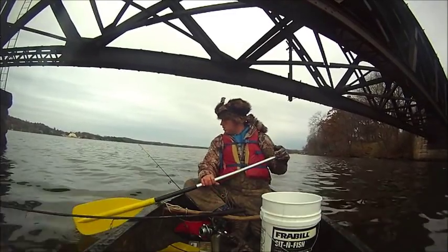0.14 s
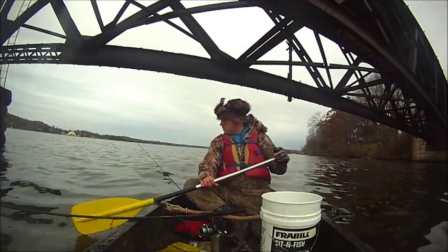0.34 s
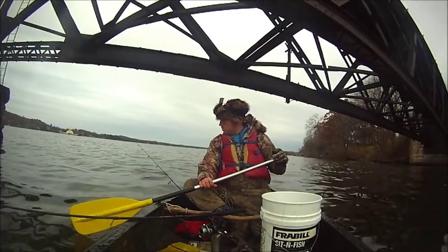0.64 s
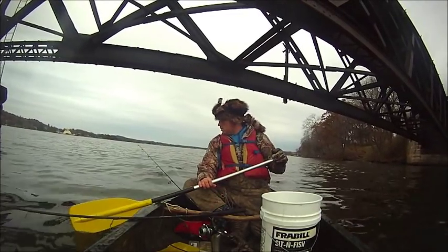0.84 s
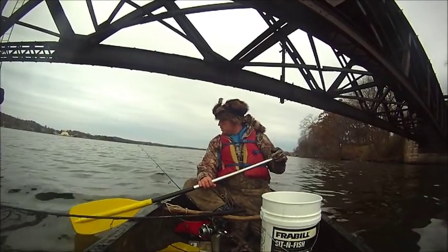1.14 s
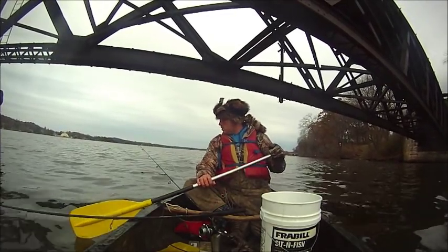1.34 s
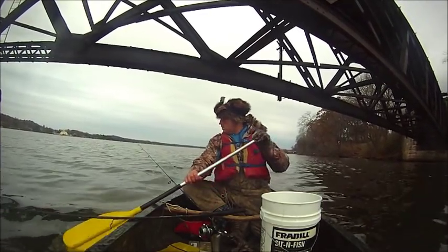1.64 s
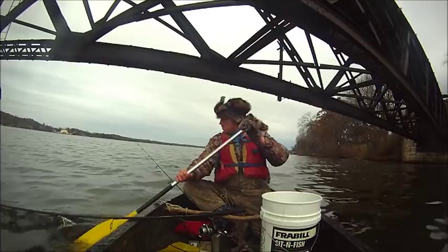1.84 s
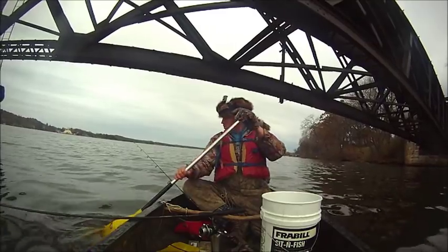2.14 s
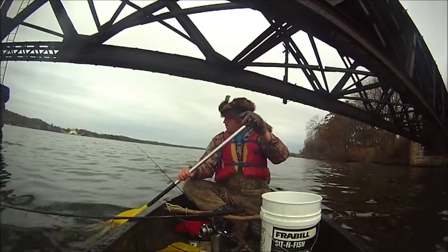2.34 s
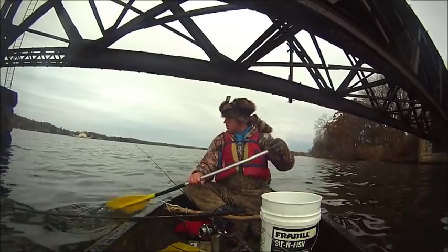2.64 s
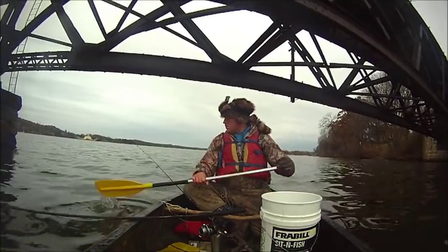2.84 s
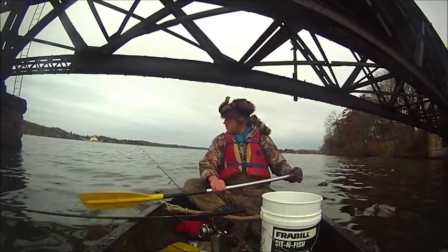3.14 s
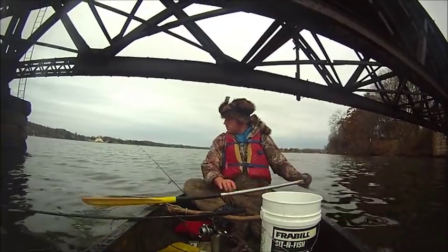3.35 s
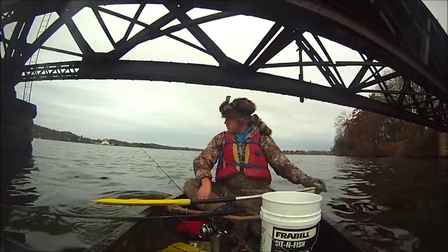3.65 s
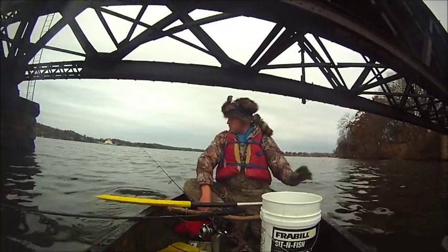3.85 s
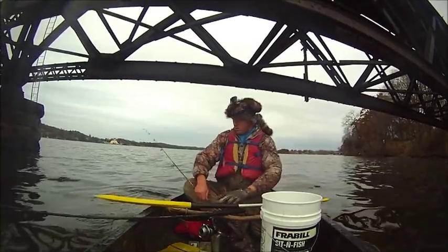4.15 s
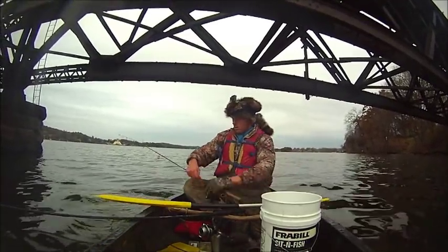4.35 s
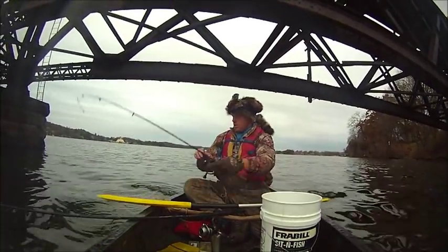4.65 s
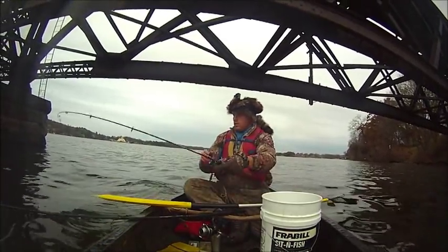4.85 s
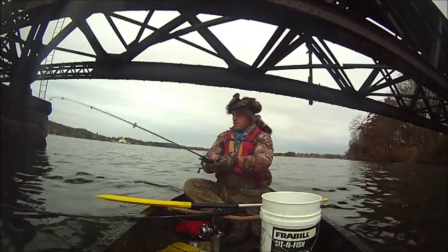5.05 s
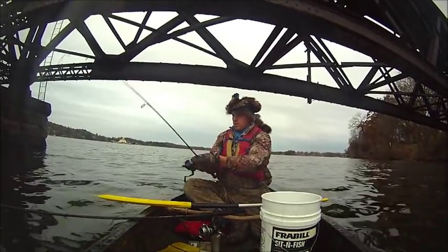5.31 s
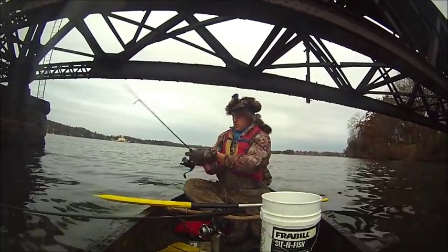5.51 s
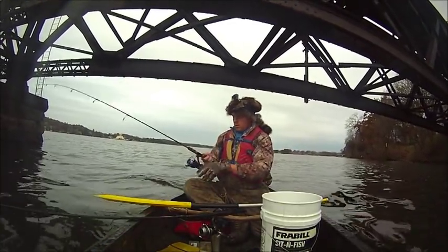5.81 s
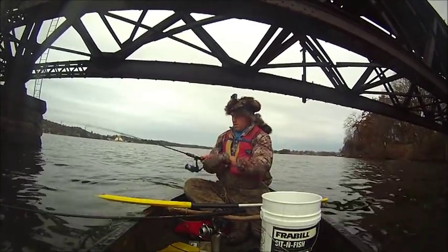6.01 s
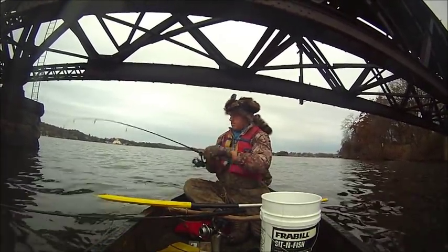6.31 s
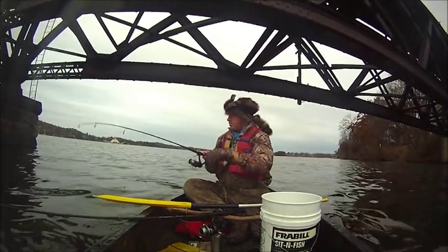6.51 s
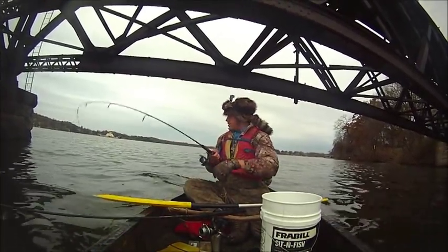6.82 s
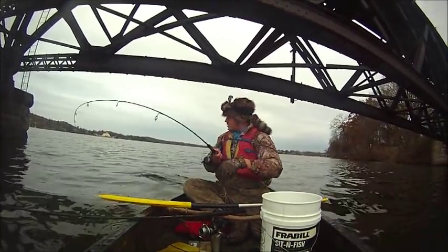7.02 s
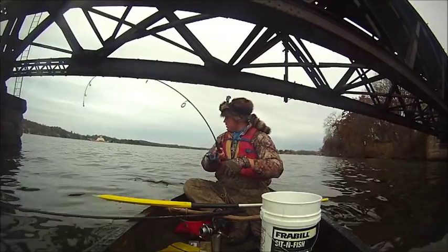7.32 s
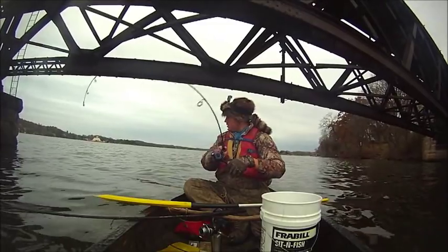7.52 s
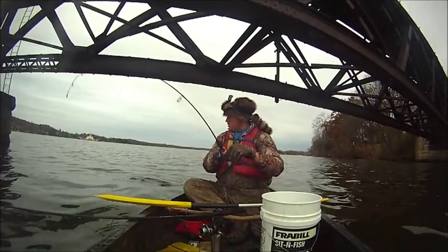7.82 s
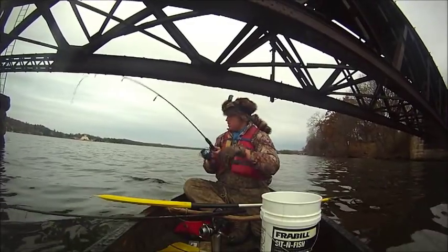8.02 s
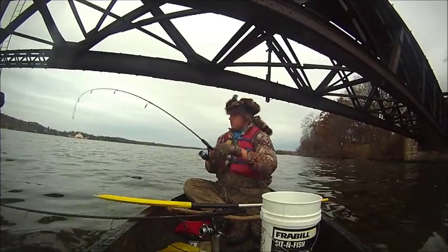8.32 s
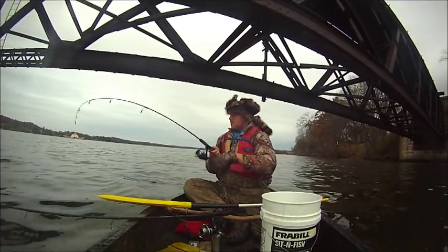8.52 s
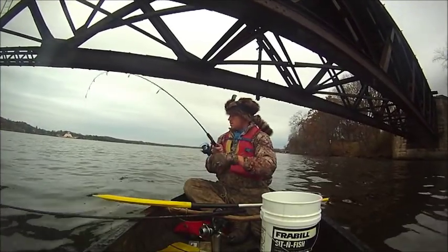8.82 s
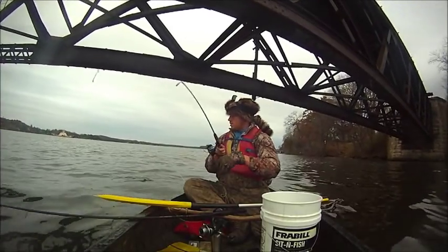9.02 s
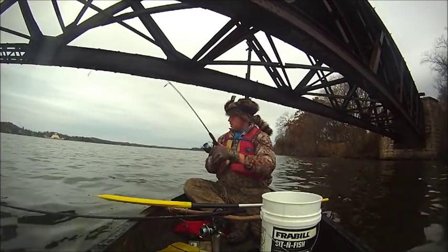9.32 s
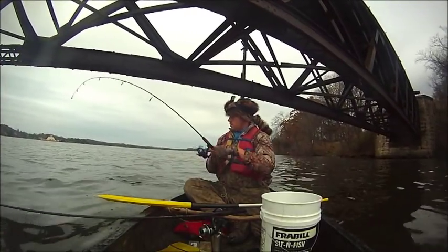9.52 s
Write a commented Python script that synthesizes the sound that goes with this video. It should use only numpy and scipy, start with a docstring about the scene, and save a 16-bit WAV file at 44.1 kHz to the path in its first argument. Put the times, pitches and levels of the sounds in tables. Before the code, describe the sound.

A paddle knocks and rubs a hollow canoe hull, strokes the water, then clatters down before a fishing reel faintly ticks over low rumble.

```python
"""Over a low rumble and a faint wavering hum that last throughout, a paddle bumps a canoe on a lake.
The microphone is in a cased camera fixed to the hull. The paddle rubs along the side, makes one stroke
and is laid clattering across the gunwales; then a fishing rod is picked up and reeled in.
Knocks, taps and drops are struck decaying modes; rub, reel and water are random clicks sent through
resonances; rumble, wash, cracks and bright overload clicks are shaped noise."""
import sys
import numpy as np
from scipy import signal
from scipy.fft import rfft, irfft, next_fast_len
from scipy.io import wavfile
from scipy.ndimage import uniform_filter1d

SR = 44100
rng = np.random.default_rng(int(sys.argv[2]) if len(sys.argv) > 2 else 0)


def master(y):
    """Save y as 16-bit WAV."""
    cut = np.clip(np.atleast_2d(y).T, -1, 1)
    pcm = np.round(cut * 32767)  # scale
    wavfile.write(sys.argv[1], SR, pcm.astype(np.int16))


N = 426182  # length in samples

# Levels in event and mode tables are relative: each source adds its own trim in dB.
# Paddle on hull: start_s, contact tick_db, hull boom_db, panel clonk_db
PADDLE_KNOCKS = [(0.2027,-32,-5,-11.5), (0.2500,-32.5,-26,-39), (3.329,-30.5,-15.5,-7),
                 (3.3583,-30,-20.5,-42), (3.4457,-36,-47.5,-43.5), (3.474,-44,-25,-45),
                 (3.498,-25,-2.5,-8.5), (3.5304,-30.5,-6,-20), (3.578,-36,-9.5,-16.5),
                 (3.607,-26.5,-23,-25.5), (3.7193,-36.5,-20,-23), (4.0006,-19,-9.5,-3), (4.0355,-31,-11,-7),
                 (4.0493,-26,-33,-14), (4.0687,-33,-12,-7.5), (4.0793,-26,-12.5,-6), (4.1054,-26,-22,-18),
                 (4.124,-25,-22,-17), (4.1384,-31,-29,-8), (4.1603,-26,-14,-9), (4.1741,-39,-9.5,-11),
                 (4.1895,-23,-15,-27), (4.2394,-44.5,-19.5,-34), (4.4271,-32.5,-27,-17),
                 (4.4532,-35,-20.5,-20), (4.4696,-40,-17.5,-21)]
# The paddle's weight landing on the gunwales: start_s, thump_db, overload click_db
LANDINGS = [(3.508,-16,-31.5), (4.002,-10.5,-21.5), (4.048,-25,-36), (4.082,-19.5,-37), (4.176,-22.5,-39)]
# Ring of the camera case: pitch_hz, level_db, t60_s (time to fall 60 dB)
CASE_RING = [(1440, -4, 0.011), (1757, -7, 0.066), (2093, 5, 0.022), (2190, -0.5, 0.046),
             (2298, -8.5, 0.088), (3710, -6, 0.0069), (5230, -18.5, .03), (5840, -25.5, 0.043),
             (7960, -18, 0.021), (9100, -19, 0.022)]
# Spectrum of the crowd of weak hull modes: frequency_hz, relative level_db_per_hz
WEAK_HULL_MODES = [(50, -16), (130, -2), (210, 2), (300, 1.5), (400, -7.5), (540, -10.5), (700, -10),
                   (1000, -26), (1500, -34), (4000, -57.5)]
# Spectrum of the crack of a contact: frequency_hz, relative level_db_per_hz
CONTACT_CRACK = [(500, -16.5), (1100, 6), (2200, 9), (2900, -2), (6000, -9.5), (14000, -24.5),
                 (16000, -27.5)]
# Spectrum of short bright clicks, from overload and from drips: frequency_hz, relative level_db_per_hz
BRIGHT_CLICK = [(3000, -24), (7000, 7.5), (9000, 3), (13000, 5.5), (15500, 4.5)]


def from_db(db):
    """Decibels to gain."""
    return 10 ** (np.asarray(db) / 20)


def rms_one(x):
    """Scale to rms 1."""
    return x / np.sqrt(np.mean(x ** 2) + 1e-20)


def gains(rows):
    """Level curves as gains in time, all but silent outside their span."""
    s, *columns = np.transpose(rows)
    t = np.arange(N) / SR
    return [from_db(np.interp(t, s, db, left=-140, right=-140)) for db in columns]


def colour(x, spectrum):
    """Give x a spectrum, drawn straight between points on a log frequency scale; rms 1."""
    hz, db = np.transpose(spectrum)
    size = next_fast_len(N)
    f = np.maximum(np.arange(size // 2 + 1) * SR / size, 1)
    weight = from_db(np.interp(np.log(f), np.log(hz), db))
    return rms_one(irfft(rfft(x, size) * weight, size)[:N])


def noise(spectrum):
    """Steady noise of a given spectrum; rms 1."""
    return colour(rng.standard_normal(N), spectrum)


def ring(x, hz, t60):
    """A unit click sets a decaying sine ringing, starting at height 1."""
    r, w = np.exp(-np.log(1000) / (t60 * SR)), 2 * np.pi * hz / SR
    return signal.lfilter([0, np.sin(w)], [1, -2 * r * np.cos(w), r * r], x + 1e-18)


def resonate(x, hz, width):
    """A resonance of given width in Hz; rms 1."""
    r, w = np.exp(-np.pi * width / SR), 2 * np.pi * hz / SR
    return rms_one(signal.lfilter([1, 0, -1], [1, -2 * r * np.cos(w), r * r], x))


def soften(x, hz):
    """A low-pass: a yielding contact takes the edge off."""
    return signal.sosfilt(signal.butter(2, min(hz, .4 * SR), fs=SR, output="sos"), x)


def clicks(times, db):
    """One impulse for each event."""
    out = np.zeros(N)
    out[np.round(times * SR).astype(int)] = from_db(db)
    return out


def fade(times, db, t60):
    """Envelope that jumps at each hit and dies away; hits add in power."""
    r = np.exp(-2 * np.log(1000) / (t60 * SR))
    return np.sqrt(signal.lfilter([1], [1, -r], clicks(times, db) ** 2 + 1e-18))


def strike(times, db, modes, spread_db, detune=0):
    """Each blow lands elsewhere, so every mode gets its own strength and a slightly shifted pitch."""
    hz, mode_db, t60 = np.transpose(modes)
    t = np.arange(int(min(1.2 * t60.max(), .5) * SR)) / SR
    signs = (-1) ** np.arange(len(hz))[:, None]  # neighbouring modes start in opposite directions
    decay = from_db(-60 * t / t60[:, None]) * signs
    out = np.zeros(N + SR)  # room for the last rings to run past the end
    chances = rng.standard_normal((len(times), 2, len(hz)))
    for s, level, (strength, shift) in zip(times, db, chances):
        waves = decay * np.sin(2 * np.pi * np.outer(hz * (1 + detune * shift), t))
        at = round(s * SR)
        out[at:at + len(t)] += from_db(level + mode_db + spread_db * strength) @ waves
    return out[:N]


def grains(per_s, spread_db):
    """Random clicks of uneven size and either sign."""
    sizes = from_db(spread_db * np.minimum(rng.exponential(1, N), 4)) * rng.choice([-1, 1], N)
    return sizes * (rng.random(N) < per_s / SR)


def drift(rate):
    """Slow random wandering through about rate random points a second; rms 1."""
    knots = rng.standard_normal(int(rate * N / SR) + 2)
    return rms_one(np.interp(np.linspace(0, len(knots) - 1, N), np.arange(len(knots)), knots))


def bubbles(per_s, low_hz, high_hz, cycles, count):
    """Each bubble rings for some cycles at one of count pitches; rms 1."""
    births, size = grains(per_s, spread_db=3.0), rng.integers(0, count, N)
    pitches = np.geomspace(low_hz, high_hz, count)
    return rms_one(sum(ring(births * (size == k), hz, cycles / hz) * np.sqrt(hz)
                       for k, hz in enumerate(pitches)))


def swells(rows, rise_s, fall_s):
    """Each movement builds up, holds and dies down; as a gain in time."""
    t = np.arange(N) / SR
    total = np.zeros(N)
    for s, length, db in rows:
        slope = np.minimum((t - s) / rise_s, (s + length - t) / fall_s)
        total += from_db(db) * np.clip(slope, 0, 1)
    return total


def scatter(start, length, per_s, spread_db):
    """Unevenly spaced light contacts over a stretch of time: start_s, level_db."""
    slip, size = rng.random(32), rng.standard_normal(32)
    s = start + (np.arange(len(slip)) + .6 * slip) / per_s
    inside = s < start + length
    return s[inside], spread_db * size[inside]


def background(rumble_trim_db=4.0, air_db=-52):
    """Low rumble that swells as the boat rocks, distant wash, steady tones and a thin, wavering hum."""
    # Rumble level: time_s, level_db
    rumble_level = [(0, -40), (.5, -37), (1.3, -43), (2.3, -40), (2.7, -47), (5.3, -51), (6.1, -44),
                    (6.8, -46), (8.1, -50), (9.66, -46)]
    # Spectrum of the rumble: frequency_hz, relative level_db_per_hz
    rumble_spectrum = [(10, -15.5), (22, 5.5), (35, -2), (55, -9), (80, -9.5), (105, -13.5), (135, -24),
                       (185, -24), (300, -34.5), (600, -77)]
    # Spectrum of the distant wash: frequency_hz, relative level_db_per_hz
    air_spectrum = [(120,-22), (200,-8.5), (298,-8.5), (399,-11), (500,-9), (560,-2.5), (630,-10.5),
                    (798,-17.5), (1230,-27.5), (1980,-27), (2960,-31), (9660,-36.5), (12500,-35.5),
                    (15500,-35.5)]
    # Hum level: time_s, level_db
    hum_level = [(0, -54), (4.9, -51), (6.3, -54.5), (7.1, -46.5), (7.6, -56.5), (8.55, -67), (8.75, -46.5),
                 (9.66, -46)]
    # Lesser steady tones, as narrow bands of noise: pitch_hz, width_hz, level_db
    steady_tones = [(74.8, 2.5, -50.5), (139.5, 7.8, -56.5), (2193, 58, -73), (12040, 3, -81.5)]

    s, _, boom, _ = np.transpose(PADDLE_KNOCKS)
    # the boat rocks after each knock, at a level relative to the boom
    rocking = soften(fade(s, boom - 30.5, t60=1.3), hz=20)
    rumble = from_db(rumble_trim_db) * (gains(rumble_level)[0] + rocking) * noise(rumble_spectrum)
    air = from_db(air_db) * noise(air_spectrum)

    pitch_hz = 543 + 1.68 * drift(rate=24) + 2.0 * drift(rate=2)
    hum_gain = gains(hum_level)[0] * from_db(-2.0 + 1.5 * drift(rate=11))
    hum = hum_gain * np.sqrt(2) * np.sin(2 * np.pi * np.cumsum(pitch_hz) / SR)
    tones = sum(from_db(db) * resonate(rng.standard_normal(N), hz, width)
                for hz, width, db in steady_tones)
    return rumble + air + hum + tones


def reeling(rustle_trim_db=-6.5):
    """Gear teeth tick in the reel, unevenly as the handle turns, while sleeves and line rustle."""
    # Bouts of cranking the reel: start_s, length_s, level_db
    crank_bouts = [(6.6, 0.72, -66), (7.95, 1.4, -67)]
    # Resonances of the reel: pitch_hz, width_hz, level_db
    reel_resonances = [(7460, 35, -6), (9300, 270, -1.5), (11700, 120, -11), (13000, 730, 2.5),
                       (14200, 220, 0.5)]
    # Arm movements that rustle sleeves and line: start_s, length_s, level_db
    arm_moves = [(4.5, 1.6, -68), (5.7, 0.33, -61.5), (6.3, .55, -61), (7.15, .55, -63), (7.7, 0.97, -66),
                 (8.5, 1.15, -65.5)]

    turns_per_s, swing_db = 3.2, 1.5  # the teeth bite harder once in every turn of the handle
    turns = turns_per_s * np.arange(N) / SR + .2 * drift(rate=2)
    bite_db = 3 * drift(rate=20) + swing_db * np.sin(2 * np.pi * turns)
    teeth = grains(per_s=220, spread_db=2.5) * from_db(bite_db)
    whirr = rms_one(sum(from_db(db) * resonate(teeth, hz, width) for hz, width, db in reel_resonances))

    creases = grains(per_s=50, spread_db=3.0) * from_db(3 * drift(rate=14))
    rustle = resonate(resonate(creases, hz=2206, width=150), hz=2250, width=3500)
    cranking = swells(crank_bouts, rise_s=0.31, fall_s=0.13) * whirr
    moving = swells(arm_moves, rise_s=0.1, fall_s=0.1) * rustle
    return cranking + from_db(rustle_trim_db) * moving


def tackle(tick_trim_db=-8.0, crack_trim_db=-15.0, hull_trim_db=2.5, clack_trim_db=-11.0):
    """Gear taps the boat and bumps its panels, the rod butt clacks."""
    # Clearest taps of tackle and gear: start_s, tick_db, hull_db
    clear_taps = [(1.7629,-39.5,-39), (4.6301,-35.5,-42.5), (4.735,-38.5,-40.5), (4.8584,-39.5,-41),
                  (4.926,-60,-40), (5.167,-44.5,-46), (6.1958,-49,-40), (6.3418,-37.5,-55),
                  (6.518,-49,-40.5), (7.2804,-41,-56), (9.2234,-37,-37)]
    # Hollow clacks of the rod butt: start_s, level_db
    butt_clacks = [(7.328,-22.5), (9.2195,-31)]
    # Modes of a clack: pitch_hz, level_db, t60_s
    butt_modes = [(295, 1.5, 0.18), (465, 1.5, 0.045), (777, 7, 0.057), (932, -4.5, 0.1), (920, -18, 0.029),
                  (1086, 1, 0.05), (1200, -5, 0.017)]

    # fainter taps at random while the rod is handled
    s, db = scatter(start=4.7, length=2.5, per_s=3.2, spread_db=0.5)
    faint_taps = (s, -53 + db, -50.5 + db)
    s, tick, hull = np.hstack([np.transpose(clear_taps), faint_taps])
    taps = strike(s, tick + tick_trim_db, CASE_RING, spread_db=2.0, detune=.05)
    taps += noise(CONTACT_CRACK) * fade(s, tick + crack_trim_db, t60=0.069)

    # padded contacts swell for a few milliseconds and are too light for the lowest hull modes
    panels = resonate(noise(WEAK_HULL_MODES), hz=403, width=590)
    bumps = panels * soften(fade(s, hull + hull_trim_db, t60=0.22), hz=90)

    s, db = np.transpose(butt_clacks)
    clacks = strike(s, db + clack_trim_db, butt_modes, spread_db=1.5)
    return soften(taps, hz=5000) + bumps + soften(clacks, hz=2000)


def water(gurgle_trim_db=-0.5, wash_db=-5.0, drop_trim_db=-9.0, tick_trim_db=-8.0):
    """The blade stirs up big bubbles and sheds small ones over a soft wash; drops splash and plop."""
    # Blade in the water: time_s, gurgle_db, spray_db
    blade_stroke = [(1.9, -60, -69), (1.98, -51, -70.5), (2.39, -43, -56.5), (2.874, -46.5, -56.5),
                    (2.92, -52.5, -51.5), (3.116, -41, -57), (3.3, -64, -77.5)]
    # Spectrum of the big bubbles: frequency_hz, relative level_db_per_hz
    gurgle_spectrum = [(150, -18), (280, -7.5), (450, -5.5), (570, 4.5), (750, -6), (1000, -14),
                       (1500, -23), (4000, -45)]
    # Spectrum of the small bubbles: frequency_hz, relative level_db_per_hz
    spray_spectrum = [(500, -24.5), (1000, -13.5), (1500, -7), (1900, 5), (2250, 5), (2900, -11),
                      (3700, -3), (4500, -24), (8000, -21), (9200, -7.5), (10700, -27), (13000, -14),
                      (15000, -20)]
    # Biggest drops and slaps of water: start_s, plop_db, splash_db
    big_drops = [(1.956,-35,-53), (2.039,-41,-56), (2.281,-39,-55), (2.392,-39,-53), (2.424,-35,-49),
                 (2.457,-42,-56), (2.515,-45,-44.5), (2.617,-36.5,-54), (2.798,-31,-46), (3.108,-42,-59),
                 (3.158,-32.5,-57), (6.181,-36.5,-62), (7.444,-41.5,-58)]
    # Modes of a plop: pitch_hz, level_db, t60_s
    plop_modes = [(446, -8, 0.023), (557, 9, 0.13), (653, 8, 0.044), (822, -2.5, 0.1), (993, -13, 0.033)]
    # Thin sharp ticks of drips: start_s, level_db
    drip_ticks = [(2.6424,-42.5), (3.1512,-33)]

    gurgle, spray = gains(blade_stroke)
    big = colour(bubbles(per_s=130, low_hz=300, high_hz=1400, cycles=30, count=24), gurgle_spectrum)
    big = rms_one(big + from_db(wash_db) * noise(gurgle_spectrum))
    small = colour(bubbles(per_s=500, low_hz=1100, high_hz=14500, cycles=60, count=44), spray_spectrum)
    spurts = from_db(2 * drift(rate=16))
    small = rms_one(spurts * small + from_db(wash_db) * noise(spray_spectrum))

    s, plop, splash = np.transpose(big_drops)
    drops = strike(s, plop + drop_trim_db, plop_modes, spread_db=2.0, detune=.07)
    drops += noise(CONTACT_CRACK) * fade(s, splash, t60=0.029)
    s, db = np.transpose(drip_ticks)
    drops += noise(BRIGHT_CLICK) * fade(s, db + tick_trim_db, t60=0.021)
    return from_db(gurgle_trim_db) * gurgle * big + spray * small + drops


def shaft_rub(panel_db=-5.5):
    """The shaft sticks and slips on the gunwale, keeping the hull's main mode going."""
    # Shaft rubbing along the gunwale: time_s, level_db
    rub_level = [(1.62, -59), (1.662, -29), (1.776, -24.5), (1.88, -53)]

    slips = grains(per_s=500, spread_db=1.5)
    groan = resonate(resonate(slips, hz=227.7, width=5.2), hz=233.7, width=45.0)
    # the steady push of the arms holds the groan at an even strength
    groan = groan / np.sqrt(uniform_filter1d(groan ** 2, size=2200) + 1e-9)
    panels = resonate(resonate(slips, hz=297, width=36), hz=400, width=420)
    rub = rms_one(soften(groan + from_db(panel_db) * panels, hz=740))
    return gains(rub_level)[0] * rub


def overload_clicks(click_trim_db=-6.0, count=3, gap_s=0.013, loss_db=9):
    """Short bright clicks, each weaker than the last, where the loudest knocks overload the microphone."""
    s, _, db = np.transpose(LANDINGS)
    repeat = np.arange(count)[:, None]
    times = (s + gap_s * repeat).ravel()
    levels = (db + click_trim_db - loss_db * repeat).ravel()
    return noise(BRIGHT_CLICK) * fade(times, levels, t60=0.024)


def contacts():
    """Every touch of the paddle, from knocks, rebounds and jiggling: start_s, tick_db, boom_db, clonk_db."""
    # Paddle shifting and jiggling on the hull: start_s, length_s, contact tick_db, hull_db
    paddle_jiggles = [(3.792, .1, -41.5, -26), (4.33, .065, -50, -32)]

    s, tick, boom, clonk = np.transpose(PADDLE_KNOCKS)
    # the shaft flexes and touches again, more weakly, about 9 ms after every knock
    again = s + .009 * (1 + .04 * rng.standard_normal(len(s)))
    touches = [(s, tick, boom, clonk), (again, tick - 12.5, boom - 7, clonk - 12.5)]
    for start, length, tick, hull in paddle_jiggles:
        s, db = scatter(start, length, per_s=45, spread_db=1.0)
        touches.append((s, tick + db, hull + db, hull + db - 4))
    return np.hstack(touches)


def paddle_knocks(boom_trim_db=-1.0, clonk_trim_db=-3.0, tick_trim_db=-8.0, thump_trim_db=0.5):
    """Hull booms, panels clonk, contacts tick through the camera case; heavy landings shake the boat."""
    # Bending modes of the whole hull: pitch_hz, level_db, t60_s
    hull_modes = [(87, -23.5, 0.6), (149, -21.5, 0.56), (202.9, -1.5, 0.18), (223.3, -2.5, 0.33),
                  (269.8, -4.5, 0.34), (300.3, -13, 0.22)]
    # Modes of the hull panels and paddle: pitch_hz, level_db, t60_s
    panel_modes = [(321.9, -3, 0.16), (350, -5.5, 0.16), (430, -10, 0.24), (493.3, -4.5, 0.18),
                   (523, 0, 0.062), (565, -10, 0.12), (608.4, -8, .14), (662, -8.5, 0.041),
                   (758, -16, 0.089), (870.4, -14.5, 0.082), (895, -17, 0.077)]
    # Modes of the boat under a heavy landing: pitch_hz, level_db, t60_s
    landing_modes = [(80.5, -19, 0.16), (102.7, -6, 0.22), (133, 1, 0.092), (172, 5, 0.091),
                     (409, -1, 0.38), (522, -3, 0.056)]

    s, tick, boom, clonk = contacts()
    hull = strike(s, boom + boom_trim_db, hull_modes, spread_db=1.0)
    panels = strike(s, clonk + clonk_trim_db, panel_modes, spread_db=2.5, detune=.008)
    # countless weak modes blur into a short burst and a faint long tail
    burst, tail = fade(s, clonk - 11, t60=.08), fade(s, boom - 22, t60=.5)
    wash = noise(WEAK_HULL_MODES) * (burst + tail)
    case = strike(s, tick + tick_trim_db, CASE_RING, spread_db=2.5, detune=.012)
    crack = noise(CONTACT_CRACK) * soften(fade(s, tick - 14.5, t60=0.1), hz=400)

    s, db, _ = np.transpose(LANDINGS)
    thumps = strike(s, db + thump_trim_db, landing_modes, spread_db=1.5)
    return soften(hull + panels + wash + thumps, hz=1540) + case + crack


def scene():
    """Everything reaches one microphone, in the open air."""
    paddle = paddle_knocks() + overload_clicks() + shaft_rub()
    return (background() + reeling() + tackle() + water() + paddle)[None]


def record(dry):
    """The signal sits off-centre, the hardest knocks are rounded off at full scale, the top is cut."""
    offset, cutoff_hz = .0776, 15250  # offset as a fraction of full scale
    shifted = dry + offset
    rounded = shifted / (1 + shifted ** 12) ** (1 / 12) - offset
    low_pass = signal.ellip(10, .1, 80, cutoff_hz, fs=SR, output="sos")
    return signal.sosfilt(low_pass, rounded) + offset


dry = scene()
out = record(dry)
master(out)
```